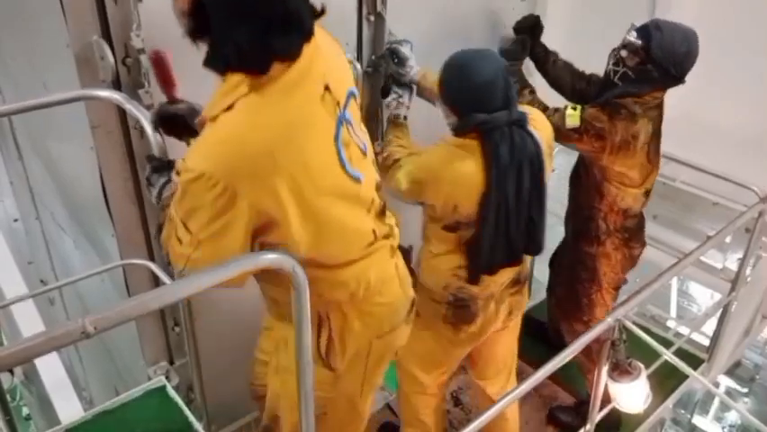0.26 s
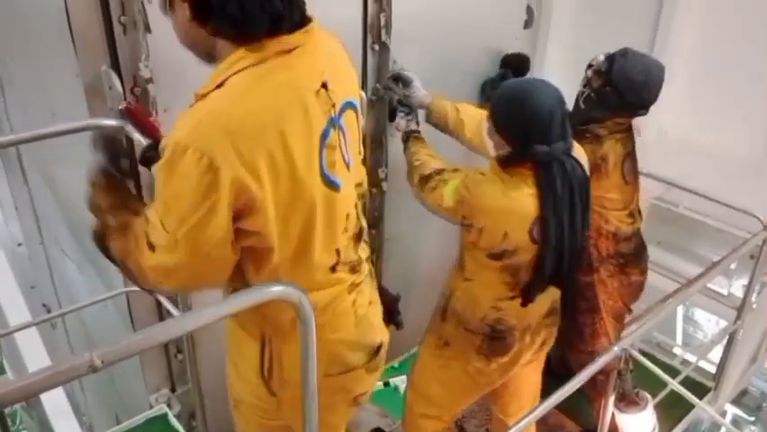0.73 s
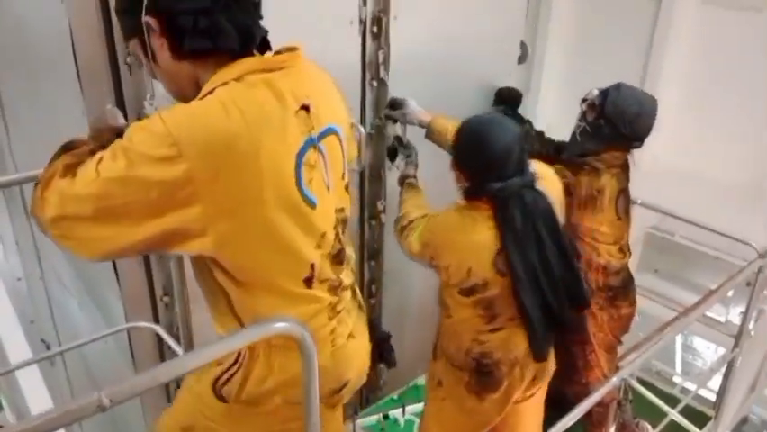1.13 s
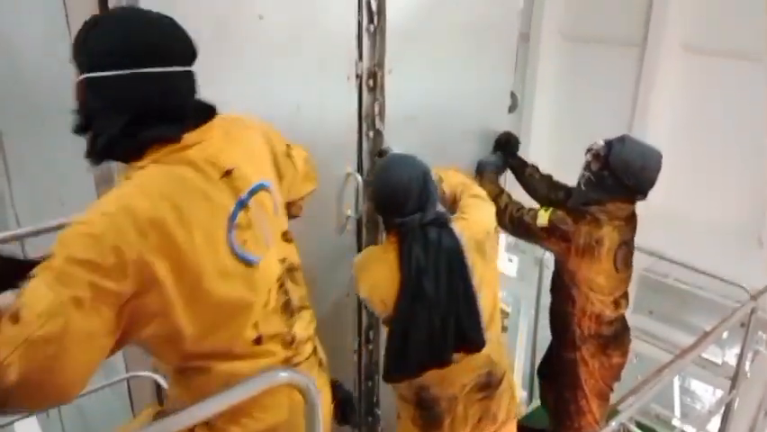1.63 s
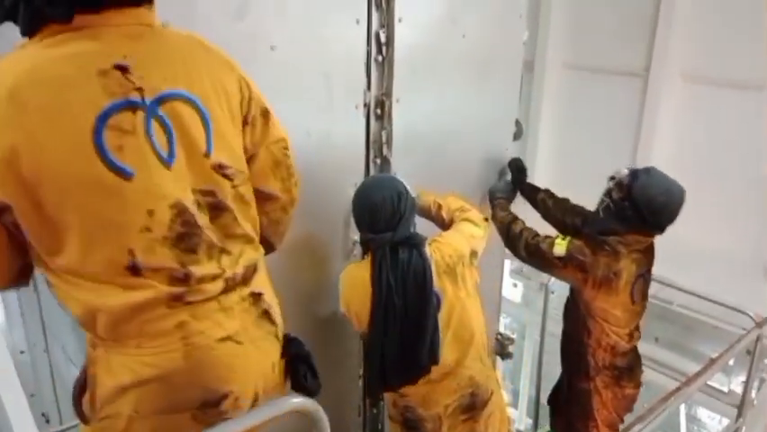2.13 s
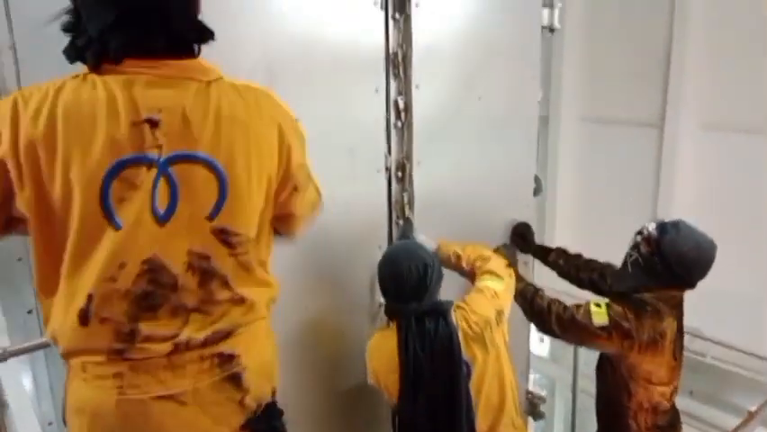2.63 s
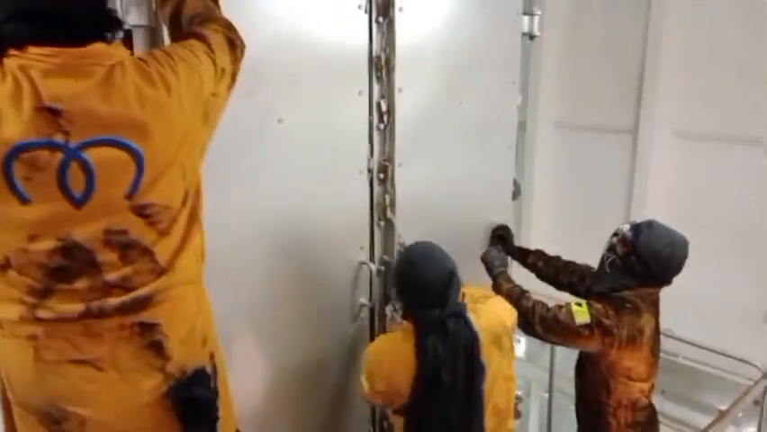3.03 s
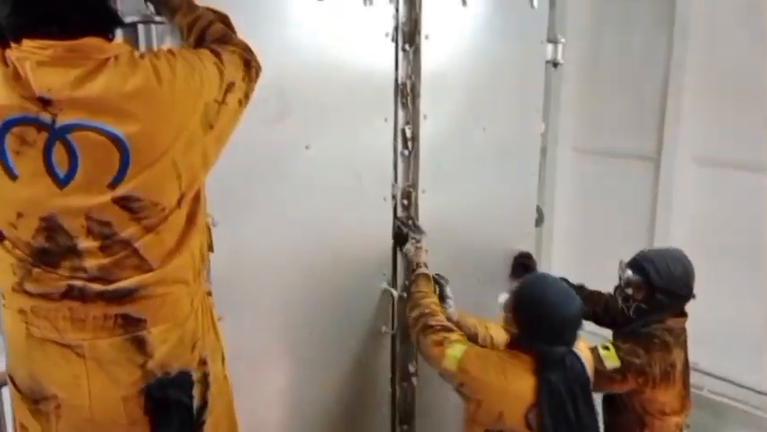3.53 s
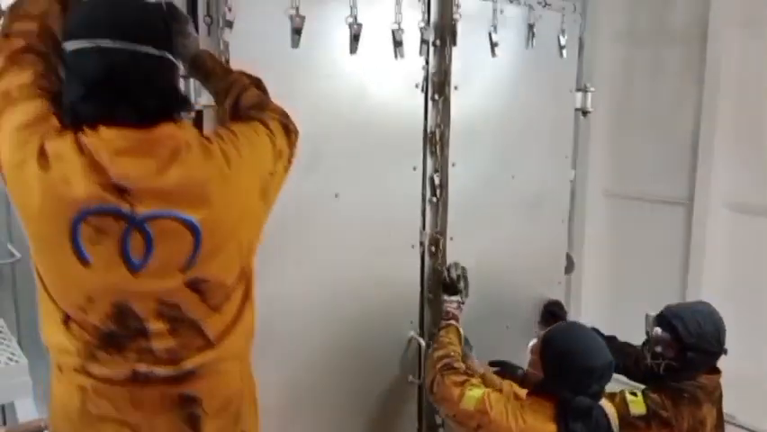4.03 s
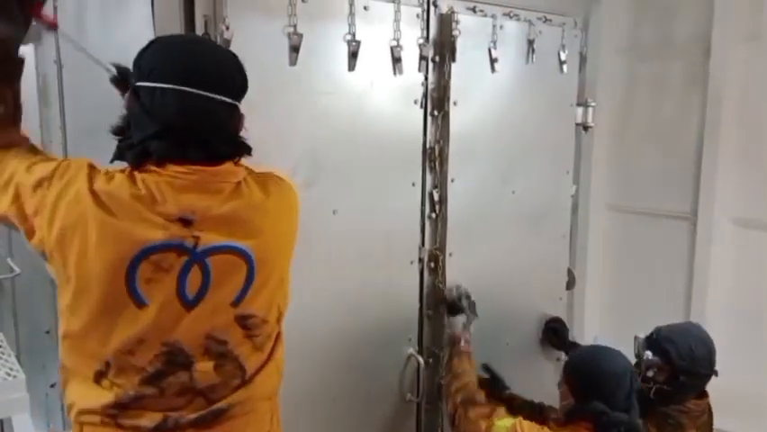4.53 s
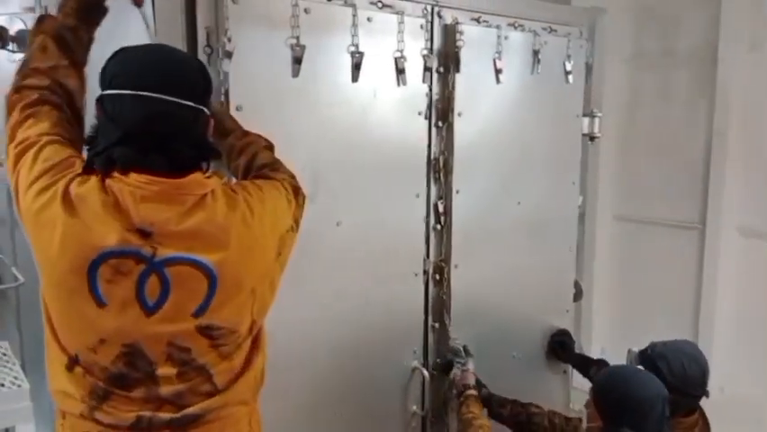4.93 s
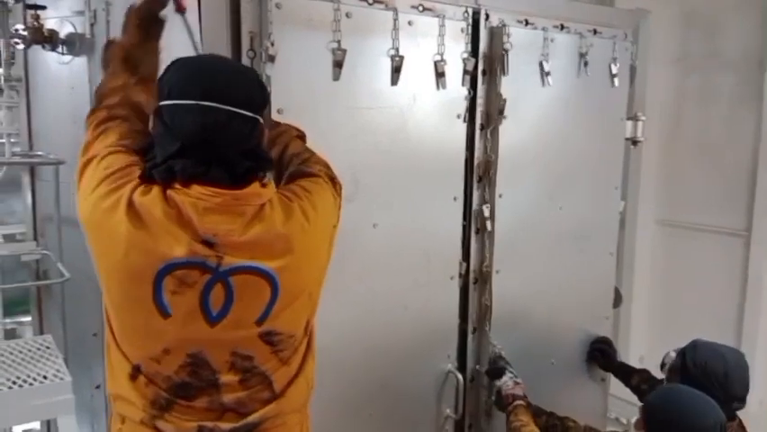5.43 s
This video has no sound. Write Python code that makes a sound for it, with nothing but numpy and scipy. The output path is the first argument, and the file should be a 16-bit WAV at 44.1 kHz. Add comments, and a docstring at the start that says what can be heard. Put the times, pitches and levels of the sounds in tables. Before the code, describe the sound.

Inside a reverberant steel engine room, a diesel generator runs at steady speed with low hum, dense clatter and a dominant piercing gear whine around one kilohertz. Fans roar and turbocharger air hisses. Workers at a steel door add only a few tiny bright clinks and cloth rustles from about three seconds, then a short raspy scrape near the end. A handheld microphone moves slightly, making tones waver.

```python
"""A diesel generator at a governed 900 rpm fills a ship's engine room: its hum, clatter and gear whine are
multiples (orders) of the four-stroke cycle rate, wavering in the reverberant steel space. An electric motor
hums beside it. Shaped noise makes the roaring ventilation, the turbocharger hiss and a breathy whistle.
Workers at a steel door add faint clinks (ringing sine pairs), rustles (grainy noise) and a tool scrape
(a dense run of tiny slips)."""
import sys
import numpy as np
from scipy import signal
from scipy.fft import rfft, irfft, next_fast_len
from scipy.io import wavfile

SR = 44100
rng = np.random.default_rng(int(sys.argv[2]) if len(sys.argv) > 2 else 0)


def dump_mix(stems):
    """Bounce the given channels to the path in sys.argv[1] as a 16-bit WAV at rate SR."""
    frames = np.atleast_2d(stems).T  # one column per channel
    limited = np.clip(frames, -1, 1)  # hard clip at full scale
    pcm = np.round(limited * 32767).astype(np.int16)
    wavfile.write(sys.argv[1], SR, pcm)


N = 249650
FFT_SIZE = next_fast_len(N, True)
TIME = np.arange(N) / SR  # s
FREQS = np.fft.rfftfreq(FFT_SIZE, 1 / SR)  # Hz
CYCLE_HZ = 7.497  # one four-stroke cycle: two turns of the shaft
FLUTTER_DB, FLUTTER_RATE_HZ = 1.4, 4  # random level flutter of the motor and the drones


def from_db(db):
    """Decibels to amplitude."""
    return 10 ** (np.asarray(db) / 20)


def rms_one(x):
    """Scales a signal to an rms of 1."""
    return x / np.sqrt(np.mean(x ** 2) + 1e-20)


def at_hz(points, hz):
    """Gain of a spectrum table, falling 120 dB per octave beyond its ends."""
    knots_hz, level_db = np.transpose(points)
    hz = np.maximum(hz, 1)
    inside = np.clip(hz, knots_hz[0], knots_hz[-1])
    octaves_outside = np.abs(np.log2(hz / inside))
    inside_db = np.interp(np.log(inside), np.log(knots_hz), level_db)
    return from_db(inside_db - 120 * octaves_outside)


def drift(rate_hz):
    """Smooth random wandering with spread 1: noise through a two-pole lowpass."""
    # computed at every 100th sample; the first 2000 values let the filter settle
    pole = np.exp(-200 * np.pi * rate_hz / SR)
    noise = rng.standard_normal(N // 100 + 2002)
    slow = rms_one(signal.lfilter([1], [1, -2 * pole, pole * pole], noise)[2000:])
    return np.interp(np.arange(N) / 100, np.arange(len(slow)), slow)


def bump(peak_s, length_s):
    """A smooth rise and fall, 17 dB down in amplitude one length either side of its peak."""
    return np.exp(-2 * ((TIME - peak_s) / length_s) ** 2)


def air_noise(spectrum):
    """Turbulence: noise with the given density per Hz."""
    white = rfft(rng.standard_normal(FFT_SIZE))
    return irfft(white * at_hz(spectrum, FREQS), FFT_SIZE)[:N] * np.sqrt(SR / 2)


def resonant_noise(hz, width_hz):
    """Noise twice through one resonance; rms 1."""
    white = rfft(rng.standard_normal(FFT_SIZE))
    resonance = 1 / (1 + ((FREQS - hz) / (width_hz / 2)) ** 2)
    return rms_one(irfft(white * resonance, FFT_SIZE)[:N])


def resonances(table):
    """Sums the noise bands of a table."""
    return sum(from_db(db) * resonant_noise(hz, width_hz) for hz, width_hz, db in table)


def order_tone(turns, order, level_db):
    """One order as a pure tone, its level in dB rms; turns counts the cycles so far."""
    return from_db(level_db) * np.sqrt(2) * np.sin(2 * np.pi * order * turns)


# fan air before its gusts: (frequency [Hz], density [dB per Hz])
ROAR_SPECTRUM = [(20, -93), (32, -93), (45, -82), (70, -79), (85, -73), (110, -72), (145, -67), (170, -74),
                 (200, -78), (230, -70.5), (260, -70.5), (305, -74.5), (350, -71), (560, -75.8),
                 (680, -75.5), (750, -71.8), (850, -74.3), (1000, -73), (1200, -73), (1400, -73.5),
                 (1650, -73.2), (2000, -74.6), (2800, -77.8), (3100, -80.9), (3700, -85.3)]
# duct and casing resonances stirred by the air: (frequency [Hz], width [Hz], level [dB rms])
DUCT_RESONANCES = [(93, 9.8, -61), (121.5, 7, -55.5), (146, 22, -57), (1057, 24, -56), (1111, 46, -52),
                   (1690, 90, -56), (1997, 44, -62), (2094, 30, -59), (2300, 37, -58.5), (2593, 140, -58),
                   (2773, 13, -62.5), (3020, 22, -65)]


def ventilation(gust_db=0.44, gust_rate_hz=8.2):
    """Fan air roars and rings in the ducts, both gusting together."""
    gusts = from_db(gust_db * drift(gust_rate_hz))
    return (air_noise(ROAR_SPECTRUM) + resonances(DUCT_RESONANCES)) * gusts


# turbocharger air before its flicker: (frequency [Hz], density [dB per Hz])
HISS_SPECTRUM = [(3700, -89), (4350, -99), (4650, -111), (5100, -107), (5400, -99), (5900, -100),
                 (6600, -95), (8000, -93.5), (8800, -98.5), (9300, -111), (10700, -113), (11500, -121),
                 (13200, -118), (13800, -127), (15500, -126)]
# electric motors and turbine blades: (frequency [Hz], width [Hz], level [dB rms])
MACHINE_TONES = [(146.6, 1, -60), (352.5, 1, -61), (704, 2, -61), (2806, 30, -57.5), (5580, 60, -81),
                 (6627, 10, -81), (7190, 25, -77.5), (8060, 20, -81), (8620, 30, -82), (8930, 60, -82),
                 (10885, 60, -95)]


def auxiliaries(flicker_db=0.6, flicker_rate_hz=13):
    """Flickering turbocharger hiss, with narrow noise bands for the thin tones of blades and motors."""
    flicker = from_db(flicker_db * drift(flicker_rate_hz))
    return air_noise(HISS_SPECTRUM) * flicker + resonances(MACHINE_TONES)


# swells of the turbine whistle: (time [s], length [s], rise [dB])
WHISTLE_SWELLS = [(.62, .14, 4), (1.2, .35, 3), (2.78, .14, 4), (3.33, 0.36, 6.5), (4.52, .26, 6.5),
                  (5.58, .2, 5)]


def whistle(pitch_hz=5420, width_hz=53, resting_db=-77):
    """A thin, breathy turbine whistle: narrow noise that swells above a resting level (dB rms)."""
    swells_db = sum(db * bump(s, length_s) for s, length_s, db in WHISTLE_SWELLS)
    return from_db(resting_db + swells_db) * resonant_noise(pitch_hz, width_hz)


# small steel parts touching: (time [s], pitch [Hz], starting peak of the main mode [dB], t60 [s])
CLINKS = [(3.137, 10890, -63.5, 0.55), (5.01, 8980, -64.5, .45), (5.552, 10815, -67.5, 0.3),
          (5.6, 10830, -73, .9)]
# overalls brushing: (time [s], length [s], level at the peak before grain [dB rms])
RUSTLES = [(3.17, .04, -80), (3.92, .06, -78), (4.05, .03, -81), (4.255, .025, -75), (5.22, .06, -81)]


def workers(cloth_hz=9800, cloth_width_hz=9000, split_hz=23, twin_share=0.29, tick_db=-10.5, tick_t60_s=0.12):
    """Steel parts tick brightly and ring on a close pair of high modes; cloth rubs in short, grainy strokes."""
    ringing, ticks = np.zeros(N), np.zeros(N)
    for s, hz, db, t60_s in CLINKS:
        age = np.maximum(TIME - s, 0)
        main_mode = np.sin(2 * np.pi * hz * age)
        twin_mode = twin_share * np.sin(2 * np.pi * (hz - split_hz) * age)
        ringing += from_db(db - 60 * age / t60_s) * (main_mode + twin_mode)
        ticks += (TIME > s) * from_db(db + tick_db - 60 * age / tick_t60_s)
    strokes = sum(from_db(db) * bump(s, length_s) for s, length_s, db in RUSTLES)
    grain = from_db(2.5 * drift(150))
    # ticks and cloth share one grainy noise
    grainy_noise = rms_one(resonant_noise(cloth_hz, cloth_width_hz) * grain)
    return ringing + (strokes + ticks) * grainy_noise


# a hand tool on the door's edge: (time [s], length [s], level at the peak before judder [dB rms])
SCRAPE_STROKES = [(5.405, .024, -65), (5.445, .035, -67.5), (5.455, .13, -66.5)]
# the colour of its rasp: (frequency [Hz], relative level [dB])
RASP_COLOUR = [(5300, -7), (6800, 0), (8400, -1), (9500, -9), (13000, -12.5), (13900, -19), (15500, -20)]


def scrape(slips_per_s=4000, grain_db=3.5, judder_db=1.2, judder_rate_hz=90):
    """A hand tool drags over steel: a dense run of tiny, uneven slips under each stroke."""
    slip_happens = rng.random(N) < slips_per_s / SR
    direction = rng.choice([-1, 1], N)
    strength = from_db(grain_db * np.minimum(rng.exponential(1, N), 3))
    slips = slip_happens * direction * strength
    coloured = rfft(slips, FFT_SIZE) * at_hz(RASP_COLOUR, FREQS)
    rasp = rms_one(irfft(coloured, FFT_SIZE)[:N])
    strokes = sum(from_db(db) * bump(s, length_s) for s, length_s, db in SCRAPE_STROKES)
    return strokes * rasp * from_db(judder_db * drift(judder_rate_hz))


# motor hum as the listener moves, before flutter: (time [s], level [dB rms])
MOTOR_LEVELS = [(0, -57.5), (2.4, -58), (2.85, -51.5), (3.6, -52), (4.6, -55), (5.66, -55)]


def motor(pitch_hz=366):
    """An electric motor hums off the engine's orders and beats slowly against them."""
    level_db = np.interp(TIME, *np.transpose(MOTOR_LEVELS))
    return order_tone(TIME, pitch_hz, level_db + FLUTTER_DB * drift(FLUTTER_RATE_HZ))


# engine orders that stand out as drones: (multiple of the cycle rate, ...)
DRONE_ORDERS = (12, 15, 16, 53, 63, 99, 103)
# drones as the listener moves, before trim and flutter: (time [s], level of each drone [dB rms] ...)
DRONE_LEVELS = [(0.0, -54.0, -53.6, -50.2, -58.5, -55.6, -59.6, -62.9),
                (0.7, -52.8, -52.5, -54.9, -65.3, -54.0, -56.5, -59.4),
                (1.4, -50.7, -54.6, -51.7, -59.2, -52.9, -55.7, -57.6),
                (2.0, -54.2, -56.4, -49.2, -59.3, -53.5, -53.0, -56.9),
                (2.5, -54.7, -55.9, -54.7, -55.5, -51.9, -54.8, -61.8),
                (3.1, -52.6, -54.9, -48.4, -55.6, -52.4, -52.5, -54.9),
                (3.8, -56.0, -58.4, -50.7, -53.2, -50.0, -52.2, -58.4),
                (4.5, -55.1, -60.4, -53.1, -54.7, -49.4, -53.7, -55.9),
                (5.1, -55.0, -58.4, -51.7, -53.6, -49.4, -51.8, -61.3),
                (5.66, -54.2, -59.3, -51.7, -54.9, -47.8, -51.7, -59.5)]


def drones(turns, trim_db=-0.2):
    """Engine orders swell and fade as the listener crosses standing waves; short waves flutter most."""
    s, *levels = np.transpose(DRONE_LEVELS)
    flutters_db = FLUTTER_DB * np.sqrt(np.array(DRONE_ORDERS) / np.mean(DRONE_ORDERS))
    out = np.zeros(N)
    for order, level, flutter_db in zip(DRONE_ORDERS, levels, flutters_db):
        level_db = np.interp(TIME, s, level) + trim_db
        out += order_tone(turns, order, level_db + flutter_db * drift(FLUTTER_RATE_HZ))
    return out


GEAR_TEETH = 142  # teeth meshing per engine cycle
# three sidebands of the gear mesh: (distance from the mesh tone [orders], ...)
WHINE_SIDE_STEPS = (-1, -6, 6)
# whine as the listener moves, before trims, swells and flutter:
# (time [s], mesh level [dB rms], level of each of the three sidebands [dB rms] ...)
WHINE_LEVELS = [(0, -46.1, -60.7, -51.8, -46.1), (0.8, -43.5, -61.4, -51.8, -47.2),
                (1.8, -41.8, -54.7, -56.2, -57.0), (2.4, -42.2, -53.3, -56.2, -54.9),
                (3.05, -43.9, -46.7, -51.5, -49.7), (3.65, -40.5, -48.8, -49.4, -50.2),
                (4.05, -42.3, -49.0, -50.9, -53.3), (4.5, -43.4, -52.6, -52.9, -47.7),
                (5.0, -43.4, -51.0, -55.8, -53.3), (5.3, -45.9, -53.4, -56.8, -52.9),
                (5.66, -43.7, -47.9, -55.8, -50.1)]
# brief swells and fades of the mesh and sidebands: (time [s], length [s], change [dB])
WHINE_SWELLS = [(3.63, 0.034, 3.5), (5.192, 0.037, -19), (5.414, .07, -7)]


def gear_whine(turns, mesh_trim_db=0.6, side_trim_db=-2.0, flutter_db=1.4, flutter_rate_hz=5,
               neighbour_hz=1054.8, neighbour_db=-7.5):
    """The mesh tone and its sidebands beat together; a neighbouring gear just below adds another beat."""
    s, *levels = np.transpose(WHINE_LEVELS)
    mesh_db, *sides_db = (np.interp(TIME, s, level) for level in levels)
    swells_db = sum(db * bump(at_s, length_s) for at_s, length_s, db in WHINE_SWELLS)
    flutter = flutter_db * drift(flutter_rate_hz)
    mesh = order_tone(turns, GEAR_TEETH, mesh_db + mesh_trim_db + swells_db + flutter)
    sides = sum(order_tone(turns, GEAR_TEETH + step, db + side_trim_db + swells_db)
                for step, db in zip(WHINE_SIDE_STEPS, sides_db))
    # the neighbour's level follows the nearest sideband, before its trim and swells
    neighbour = order_tone(turns, neighbour_hz / CYCLE_HZ, sides_db[0] + neighbour_db)
    return mesh + sides + neighbour


def engine_cycle(gains, size=16384):
    """One cycle of sound: each order arrives with a phase left to the room."""
    orders = gains * np.exp(2j * np.pi * rng.random(len(gains)))
    return irfft(orders, size) * size / np.sqrt(2)


def repeat(cycle, turns):
    """Plays one cycle over and over at the engine's pace."""
    closed_cycle = np.append(cycle, cycle[0])
    return np.interp(turns % 1 * len(cycle), np.arange(len(cycle) + 1), closed_cycle)


# strong low orders, before trim and waver: (multiple of the cycle rate, level [dB rms])
HUM_ORDERS = [(11, -64), (13, -62), (17, -62.5), (18, -58.5), (19, -58.5), (20, -62), (21, -52),
              (22, -57.5), (24, -69), (26, -63), (28, -65), (33, -61), (34, -55.6), (35, -56.6),
              (36, -59.5), (37, -61), (39, -59.7), (41, -57.2), (46, -55.9), (47, -57.0), (48, -60.5),
              (50, -61), (51, -55.6), (54, -57.0), (57, -60.0), (61, -58.2), (62, -57.8), (65, -60.1),
              (68, -59.3), (69, -58.4), (71, -60.4), (78, -57.2)]
# strong sidebands around the gear mesh, before trim and waver: (multiple of the cycle rate, level [dB rms])
MESH_SIDEBANDS = [(121, -59.1), (123, -58.3), (127, -56.3), (128, -57.6), (130, -58.3), (131, -58.3),
                  (134, -57.7), (140, -59), (145, -54.2), (146, -58.5), (147, -58.5), (149, -56.2),
                  (150, -56.2), (151, -53.8), (154, -59.5), (160, -57.8), (162, -58.3), (164, -57.0),
                  (166, -57.8), (169, -56.6), (174, -60), (258, -58)]
# the other orders, before unevenness and waver: (frequency [Hz], level per order [dB rms])
CLATTER_SPECTRUM = [(40, -82), (55, -77), (70, -69), (130, -64), (200, -65.5), (225, -71), (300, -65),
                    (450, -65), (650, -64), (830, -65.5), (950, -65), (1200, -65), (1400, -66.5),
                    (1700, -65.5), (2000, -68), (2300, -72), (2550, -72), (2800, -76), (3300, -83),
                    (4000, -87)]


def diesel(turns, strong_trim_db=0.57, uneven_db=3.0, waver=0.55, waver_above_hz=450,
           walk_rate_hz=0.511, count=600):
    """Every cycle repeats the same knocks; paths through the room shift as the listener moves."""
    hz = np.arange(count) * CYCLE_HZ
    unevenness = from_db(uneven_db * np.clip(rng.standard_normal(count), -2, 1))
    gains = at_hz(CLATTER_SPECTRUM, hz) * unevenness
    for order, level_db in HUM_ORDERS + MESH_SIDEBANDS:
        gains[int(order)] = from_db(level_db + strong_trim_db)
    # the drones and the gear whine sound these orders on their own
    whine_orders = [GEAR_TEETH, *(GEAR_TEETH + step for step in WHINE_SIDE_STEPS)]
    gains[[*DRONE_ORDERS, *whine_orders]] = 0
    # long waves hardly change over a small step, so the bass stays firm
    share = waver * np.minimum(hz / waver_above_hz, 1)
    gains = gains / np.sqrt(1 + share ** 2)
    direct = repeat(engine_cycle(gains), turns)
    path_a = repeat(engine_cycle(gains * share), turns)
    path_b = repeat(engine_cycle(gains * share), turns)
    # one reflection gives way to another, so single orders waver while the sum stays level
    place = 2 * np.pi * walk_rate_hz * TIME + drift(0.94)
    return direct + np.cos(place) * path_a + np.sin(place) * path_b


def scene(hunting=0.00019):
    """The governor holds the speed almost still; hunting is the spread of the speed as a fraction."""
    speed_hz = CYCLE_HZ * (1 + hunting * drift(0.99))
    turns = np.cumsum(speed_hz) / SR
    background = ventilation() + auxiliaries() + whistle() + motor()
    people = workers() + scrape()
    engine = drones(turns) + gear_whine(turns) + diesel(turns)
    return (background + people + engine)[None]


def record(dry, notch_hz=4770, notch_width_hz=1100, cutoff_hz=15500):
    """The microphone port cancels one narrow band; a steep lowpass cuts the top."""
    b, a = signal.iirnotch(notch_hz, notch_hz / notch_width_hz, fs=SR)
    notched = signal.lfilter(b, a, signal.lfilter(b, a, dry))  # notched twice
    lowpass = signal.ellip(10, 0.1, 80, cutoff_hz, fs=SR, output="sos")
    return signal.sosfilt(lowpass, notched)


dry = scene()
out = record(dry)
dump_mix(out)
```